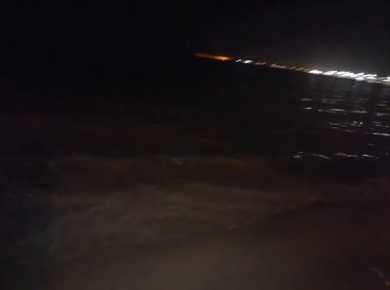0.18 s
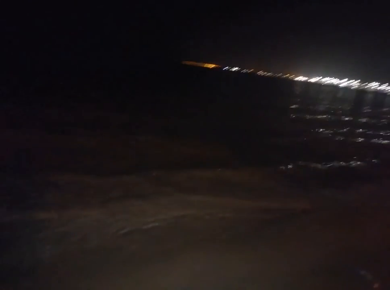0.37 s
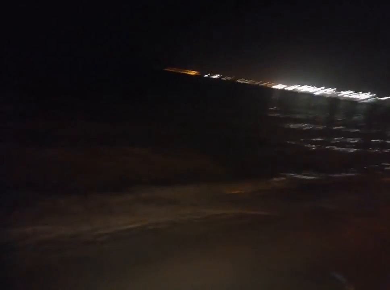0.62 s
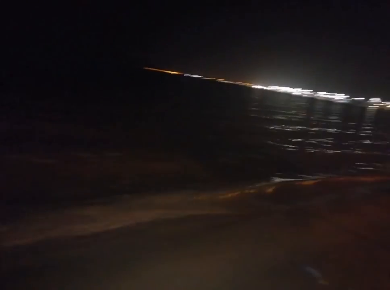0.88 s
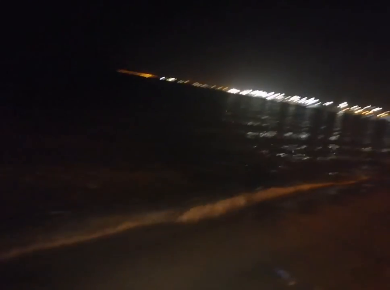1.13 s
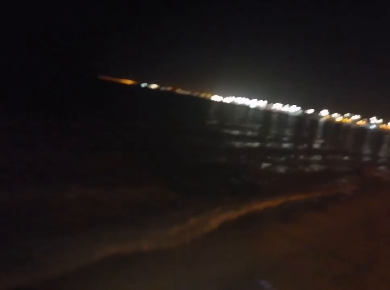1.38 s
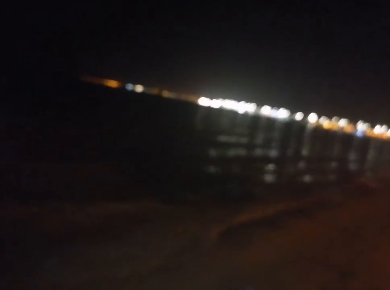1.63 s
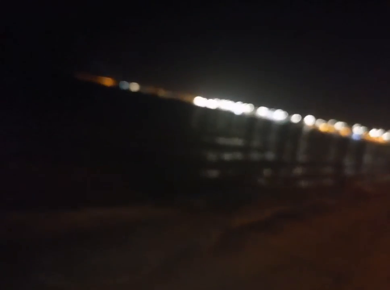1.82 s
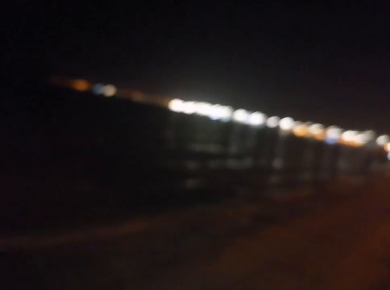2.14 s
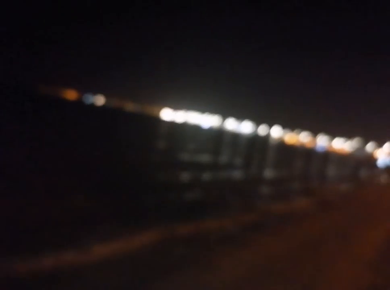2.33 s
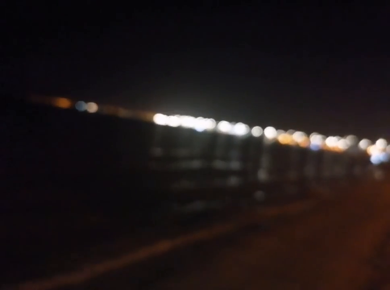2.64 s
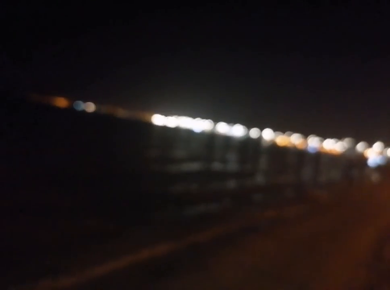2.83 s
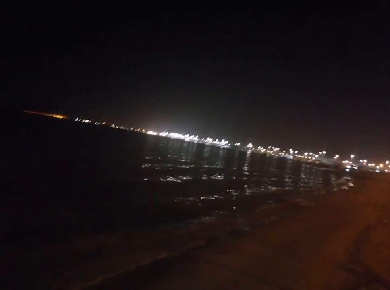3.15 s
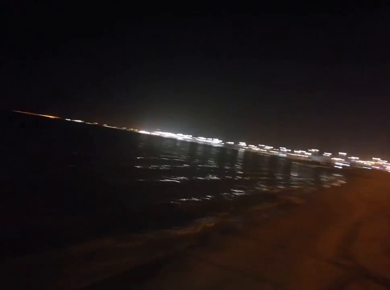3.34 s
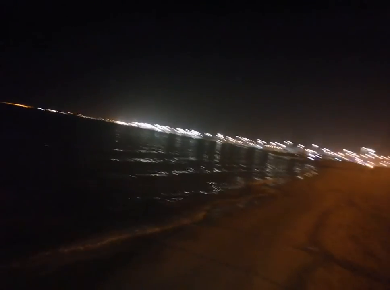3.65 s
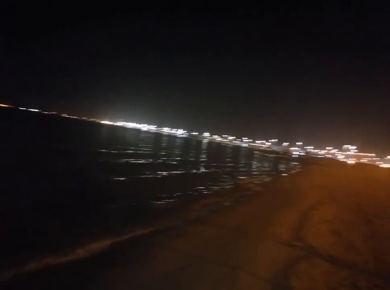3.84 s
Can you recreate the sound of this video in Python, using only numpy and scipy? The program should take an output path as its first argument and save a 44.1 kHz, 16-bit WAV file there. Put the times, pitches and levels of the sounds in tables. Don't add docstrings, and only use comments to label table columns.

```python
import sys
import numpy as np
from scipy import signal
from scipy.fft import rfft, irfft
from scipy.io import wavfile
from scipy.ndimage import uniform_filter1d

SR = 44100
rng = np.random.default_rng(int(sys.argv[2]) if len(sys.argv) > 2 else 0)


def file_out(sig):
    cols = np.atleast_2d(sig).T
    lim = np.clip(cols, -1, 1)
    pcm = np.round(lim * 32767).astype(np.int16)
    wavfile.write(sys.argv[1], SR, pcm)


def invert_db(level):
    return 10 ** (np.asarray(level, dtype=float) / 20)


N = 176400


def read(points, hz):
    f, value = np.transpose(points)
    return np.interp(np.log(hz + 1), np.log(f + 1), value)


def fade_line(points):
    s, db = np.transpose(points)
    return invert_db(np.interp(np.arange(N) / SR, s, db))


def evened(x):
    return x / np.sqrt(np.mean(x ** 2) + 1e-20)


def add(mix, s, sound):
    part = mix[max(round(s * SR), 0):][:len(sound)]
    part += sound[:len(part)]


def band(x, low_hz, high_hz):
    return signal.sosfilt(signal.butter(2, [low_hz, high_hz], "band", fs=SR, output="sos"), x)


def case_db(hz):
    # f/Hz, width/Hz, lift/dB
    resonances = [(740, 820, 2), (2520, 890, 7.5), (4230, 1600, 5), (7720, 2300, 4.5), (11220, 4700, -11),
                  (13400, 1600, -2.5)]
    return sum(db / (1 + (2 * (hz - f) / w) ** 2) for f, w, db in resonances)


def cloud(colour, patch_db, patch_s, patch_hz, flicker_db, size):
    hop = size // 4
    frames, hz = N // hop + 5, np.fft.rfftfreq(size, 1 / SR)
    real, imag, patches = rng.standard_normal((frames, len(hz), 3)).T
    bins_wide = max(round(patch_hz * size / SR), 1)
    frames_long = max(round(patch_s * SR / hop), 1)
    patches = uniform_filter1d(patches, bins_wide, axis=0)
    patches = evened(uniform_filter1d(patches, frames_long, axis=1))
    flicker = evened(uniform_filter1d(rng.standard_normal(frames), size=3))
    level = colour(hz)[:, None] + patch_db * patches + flicker_db * flicker
    z = (real + 1j * imag) * invert_db(level)
    return evened(signal.istft(z, nperseg=size, noverlap=size - hop)[1][:N])


def hum():
    # f/Hz, wander/Hz, level/dB, from t/s, to t/s, share of the swell
    tones = [
        (95, 2, -56.5, -1, 5, 0.93),
        (252, 1.8, -72, 1.2, 2.12, 0.088),
        (799, 24.4, -78, 0.98, 2.14, 0.1),
    ]
    # t/s, level/dB
    swell_line = [(0.0, -73), (0.05, -62), (0.4, -55), (1.38, -65), (1.46, -55.5), (1.67, -70.5),
                  (1.82, -51), (1.86, -73), (2.08, -54.5), (2.25, -71), (2.44, -44.5), (2.58, -60),
                  (2.73, -46), (2.77, -61), (3.55, -52), (3.6, -59), (3.68, -49), (4.0, -62.5)]
    out, t = np.zeros(N), np.arange(N) / SR
    swell = np.interp(t, *np.transpose(swell_line)) + 58
    for (hz, wander, db, t0, t1, share), noise in zip(tones, rng.standard_normal((len(tones), 2, N))):
        drift, waver = evened(uniform_filter1d(uniform_filter1d(noise, size=1500), size=1500))
        on = np.clip(np.minimum(t - t0, t1 - t) * 10, 0, 1)
        phase = 2 * np.pi * np.cumsum(hz + wander * drift) / SR
        out += on * invert_db(db + share * swell + 2.5 * waver) * np.sin(phase)
    return out


def sea():
    # f/Hz, density/dB per Hz
    spectrum = [(250, -23), (450, -11.5), (800, -5.5), (1100, -10), (1800, -18), (4500, -23.5), (7500, -29),
                (13000, -25)]
    # t/s, level/dB
    breathing = [(0, -75.5), (1.3, -71.5), (1.9, -73), (2.9, -69.5), (3.15, -72), (4, -68.5)]
    hiss = cloud(lambda hz: read(spectrum, hz) + case_db(hz) - 60 * (hz < 200),
                 patch_db=1.3, patch_s=.07, patch_hz=600, flicker_db=.4, size=1024)
    return hiss * fade_line(breathing)


def rumble():
    # f/Hz, density/dB per Hz
    spectrum = [(15, -4), (40, 4.5), (100, -4), (200, -8), (300, -16.5), (450, -30.5), (900, -53),
                (1500, -92)]
    # t/s, level/dB
    strength = [(0.0, -60), (0.48, -56), (1.43, -62), (2.05, -49), (2.31, -60.5), (2.6, -52.5), (2.85, -52),
                (3.09, -57.5), (3.43, -47.5), (4.0, -58)]
    bed = cloud(lambda hz: read(spectrum, hz) - hz / 200,
                patch_db=2.9, patch_s=.05, patch_hz=80, flicker_db=2.5, size=2048)
    return bed * fade_line(strength)


def gusts():
    # t/s, peak level/dB, length/s, swing f/Hz
    blows = [(0.129, -58, 0.1, 160), (0.287, -36.5, 0.045, 77.6), (0.408, -32.5, 0.049, 72.5),
             (0.551, -34, 0.12, 67), (0.721, -33.5, 0.12, 44.2), (0.937, -35, 0.051, 64),
             (0.992, -33, 0.087, 72.5), (1.059, -36.5, 0.068, 287), (1.757, -36, 0.087, 111.5),
             (1.451, -56, 0.16, 330), (3.27, -48, 0.19, 430), (.75, -45, 0.047, 150),
             (1.14, -46, 0.047, 260), (1.449, -46.5, 0.19, 41), (.22, -41, 0.073, 60),
             (0.408, -37, .07, 31.4), (.57, -42, 0.089, 163), (2.228, -35, 0.06, 40), (2.34, -39, .07, 108),
             (3.0, -41.5, 0.099, 150), (2.783, -47.5, 0.052, 330), (3.288, -24, 0.067, 30.2),
             (2.4, -37.5, 0.11, 228), (1.93, -42, 0.24, 215), (2.02, -31, 0.12, 72),
             (2.187, -39, 0.11, 248), (2.391, -31, 0.11, 95), (2.437, -28.5, 0.087, 117.5),
             (2.518, -31.5, 0.089, 200), (2.638, -32, 0.083, 50.4), (2.702, -38, 0.053, 95),
             (2.818, -32, 0.12, 63), (2.998, -30.5, 0.093, 60), (3.175, -38.5, 0.14, 217),
             (3.245, -33, 0.13, 186.7), (3.305, -25, 0.059, 43.5), (3.327, -29.5, 0.041, 84),
             (3.349, -39, 0.1, 304), (3.464, -30, 0.11, 53.6), (3.583, -29, 0.08, 57),
             (3.674, -35, 0.094, 71.5), (3.762, -26, .09, 51), (3.749, -40, 0.11, 247),
             (3.815, -30, 0.019, 61.7)]
    out = np.zeros(N)
    for (s, db, length, hz), noise in zip(blows, rng.standard_normal((len(blows), 16000))):
        low = band(noise, hz * 0.54, hz * 1.176)
        skirt = band(noise[::-1], 30, max(hz * 2.05, 40))
        low = low / (abs(signal.hilbert(low)) + .3 * low.std())
        low = (evened(low) + invert_db(-16) * evened(skirt))[4000:]
        u = np.arange(len(low)) / SR / max(length, .01)
        shape = np.sin(np.pi * np.minimum(u, 1) ** 0.87) ** 2
        push = shape * low / np.sqrt(np.sum((low * shape) ** 2) / np.sum(shape ** 2))
        add(out, s, invert_db(db - 14) * push)
    return out


def pops():
    # t/s, strength/dB, half period/s
    jolts = [
        (2.579, -29, .0028),
        (3.3125, -30, .0035),
    ]
    out = np.zeros(N)
    for s, db, half in jolts:
        u = np.arange(-3 * half, 5 * half, 1 / SR) / half
        add(out, s - 3 * half, -invert_db(db) * np.exp(-.5 * u ** 2) * np.sin(np.pi * u * .9 + .6))
    return out


def splats():
    # t/s, peak level/dB, centre f/Hz
    bursts = [(0.2135, -66, 4870), (0.241, -54, 1900), (0.5492, -70, 4000), (0.6474, -51, 5000),
              (0.6994, -55, 1500), (0.843, -41.5, 7350), (.879, -42, 5240), (.968, -48, 7000),
              (1.133, -47, 9600), (1.157, -40.5, 4000), (1.193, -55, 9000), (1.3588, -65, 6500),
              (2.0986, -57, 5000), (2.232, -58, 5000), (2.455, -52, 12500), (2.549, -40, 11000),
              (2.6276, -35.5, 4530), (2.651, -46, 12000), (2.744, -50.5, 5000), (3.247, -68, 5000),
              (3.4303, -54, 5010)]
    out, t, rise_s = np.zeros(N), np.arange(1500) / SR, .004
    for (s, db, hz), noise in zip(bursts, rng.standard_normal((len(bursts), 1500))):
        puff = evened(band(noise, hz * 0.31, min(hz * 1.2, 18000)))
        add(out, s, invert_db(db - 19) * puff * t / rise_s * np.exp(1 - t / rise_s))
    return out


def grains():
    per_s, spread_db, cycles = 2500, 3.0, 2.5
    size = invert_db(spread_db * np.minimum(rng.exponential(1, N), 5)) * (rng.random(N) < per_s / SR)
    kind, out = rng.integers(0, 30, N), np.zeros(N)
    for k, hz in enumerate(np.geomspace(250, 15000, 30)):
        u = np.arange(0, cycles * 2, hz / SR)
        ring = np.sin(2 * np.pi * u * (1 + 0.05 * u))
        wavelet = u * np.exp(-3 * u / cycles) * ring * hz
        out += signal.oaconvolve(size * (kind == k), wavelet)[:N]
    return evened(out)


def rustles():
    # t/s, level/dB, darkness/dB per octave
    swells = [
        [(.08, -96, 9.5), (.19, -76, 1), (.22, -72, 0), (.3, -77.5, 3.5), (.4, -74.5, -0.5), (.5, -79, 3)],
        [(.42, -86, 2), (.5, -77, -3), (.6, -64.5, -0.5), (.68, -57, -0.5), (.75, -53.5, -1.5),
         (.9, -52.5, -2.5), (1.12, -50.5, -2), (1.18, -56.5, -1.5), (1.27, -74.5, -4.5)],
        [(1.95, -82, -5), (2.03, -65, -2.5), (2.11, -56.5, -4), (2.25, -53, -3), (2.5, -47.5, -0.5),
         (2.7, -50, 0), (2.745, -56.5, 0), (2.77, -68, 0), (2.95, -74, -2)],
        [(3.12, -83, -5), (3.22, -78.5, -9), (3.27, -72, -4.5), (3.33, -66, -5), (3.44, -65, -2),
         (3.53, -61.5, -1.5), (3.58, -67, -0.5), (3.63, -66, -2), (3.7, -66, -3)],
        [(3.62, -66, 2), (3.73, -66, -3), (3.8, -62.5, -3), (3.87, -63.5, 0), (3.93, -66, 1), (4.0, -66, -0.5)],
    ]
    # f/Hz, density/dB per Hz
    body = [(88, -114), (150, 2.5), (458, -7.5), (815, -6.5), (1420, -12.5), (2390, -18), (3380, -24),
            (14900, -38)]
    # from t/s, to t/s, f/Hz, width/Hz, lift/dB, glide/octaves
    pockets = [(0.157, 0.455, 4870, 1100, 14, -0.054), (0.17, 0.44, 940, 410, 7.5, 0.17),
               (0.367, 0.675, 1940, 780, 9, 0.64), (0.45, 0.69, 4000, 695, 7, .15),
               (0.47, 0.647, 1300, 240, 13, .05), (0.52, .73, 3060, 500, -8, 0.089),
               (0.25, 1.24, 340, 200, -4, -0.027), (0.77, 0.97, 2860, 270, 3.5, .05),
               (1.15, 1.28, 2500, 570, 3, -0.037), (1.14, 1.32, 7000, 5500, -4, -.3),
               (0.92, 1.25, 1320, 230, -8.5, -0.11), (1.7, 2.25, 10800, 3300, -9, 0.011),
               (2.14, 2.4, 2100, 1800, 3, 0.16), (2.05, 2.3, 700, 500, -3.5, -0.25),
               (2.33, 2.78, 12200, 5300, 8.5, -0.31), (2.61, 2.75, 440, 240, 9.5, 0.18),
               (2.5, 2.62, 1670, 1500, 7.5, -0.17), (2.67, 4.2, 6000, 7500, -10, -0.44),
               (2.73, 2.79, 2300, 1500, 21, .05), (3.2, 3.68, 7000, 3100, 8, -0.023),
               (3.2, 3.5, 2580, 210, 6, .02), (3.15, 3.66, 4540, 1860, 11.5, .1),
               (3.405, 3.7, 820, 140, 12, -0.041), (3.44, 3.58, 1760, 770, 7, 0.13),
               (3.6, 3.74, 1800, 430, 9.5, -0.023), (3.3, 3.55, 500, 260, 7, .3),
               (3.54, 3.66, 1300, 520, -13, .05), (3.733, 3.87, 2460, 740, 9, .05),
               (3.73, 4.1, 1365, 370, 14, -0.17), (3.78, 4.1, 580, 430, 4, -0.067)]
    wash = cloud(lambda hz: 0 * hz, patch_db=1.9, patch_s=.04, patch_hz=450, flicker_db=0.9, size=256)
    hz, t, z = signal.stft(wash + invert_db(-7) * grains(), SR, nperseg=512)
    level, dark = np.zeros(len(t)), np.zeros(len(t))
    for wave in swells:
        s, db, tilt = np.transpose(wave)
        fade_in = np.clip((t - s[0]) / .03, 0, 1)
        fade_out = np.clip((s[-1] + .03 - t) / .03, 0, 1)
        gain = invert_db(np.interp(t, s, db)) * fade_in * fade_out
        dark = np.where(gain > level, np.interp(t, s, tilt), dark)
        level = np.maximum(gain, level)
    for t0, t1, f, w, db, glide in pockets:
        f = f * 2 ** (glide * ((t - t0) / (t1 - t0) - .5).clip(-1, 1))
        on = np.clip(np.minimum(t - t0, t1 - t) / .07, 0, 1)
        z = z * invert_db(db * on / (1 + (2 * (hz[:, None] - f) / w) ** 2))
    colour = invert_db(read(body, hz) + case_db(hz))
    colour = colour / evened(colour).std() / colour.std()
    octaves = np.log2(np.maximum(hz, 150) / 2040)[:, None]
    z = z * colour[:, None] * invert_db(-dark * octaves) * level
    return signal.istft(z, SR, nperseg=512)[1][:N]


def scene():
    wind = rumble() + gusts() + pops()
    rustle = splats() + rustles()
    return (hum() + sea() + wind + rustle)[None]


def band_limit(x):
    return signal.sosfilt(signal.butter(12, 15150, fs=SR, output="sos"), x)


def record(dry):
    # f/Hz, level/dB
    response = [(13600, 0), (14300, -5.5), (14700, -18), (15200, -9)]
    x = dry + invert_db(-101) * rng.standard_normal(dry.shape)
    gain = invert_db(read(response, np.fft.rfftfreq(2 * N, 1 / SR)))
    x = irfft(rfft(x, 2 * N) * gain, 2 * N)[:, :N]
    return band_limit(x)


dry = scene()
out = record(dry)
file_out(out)
```